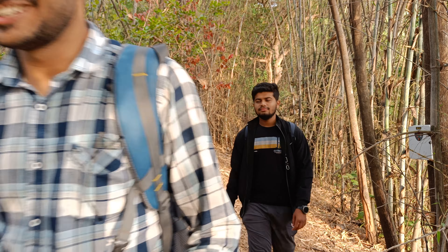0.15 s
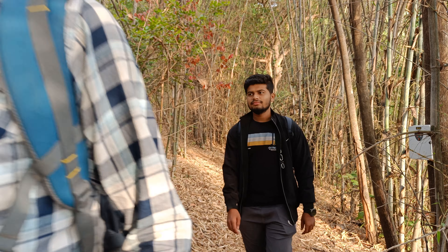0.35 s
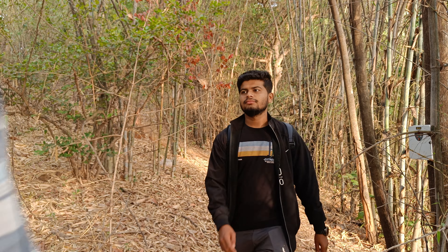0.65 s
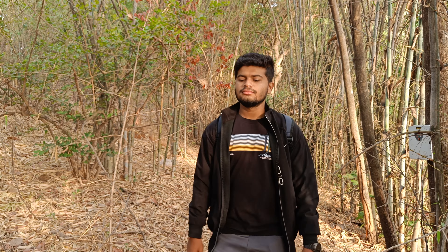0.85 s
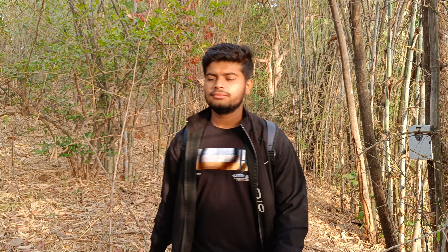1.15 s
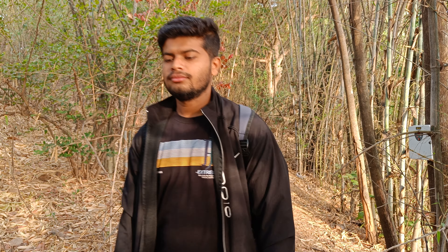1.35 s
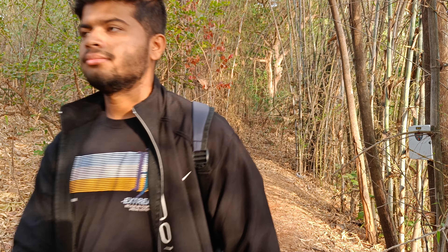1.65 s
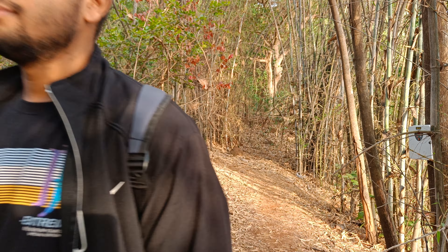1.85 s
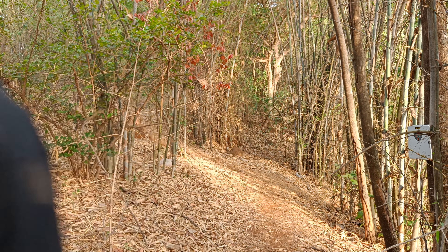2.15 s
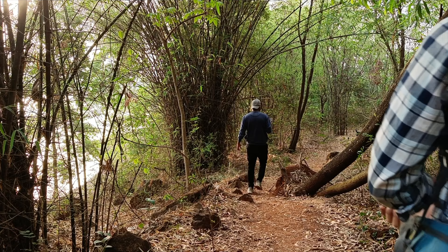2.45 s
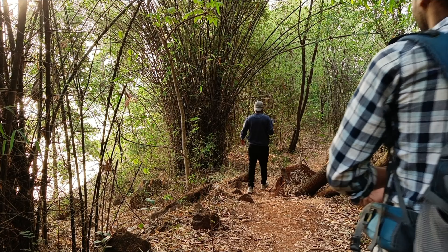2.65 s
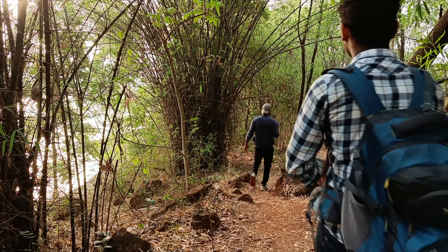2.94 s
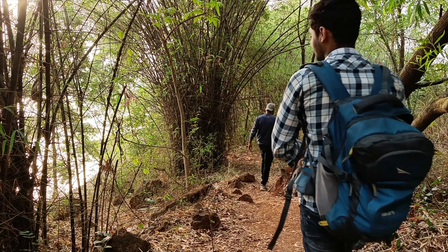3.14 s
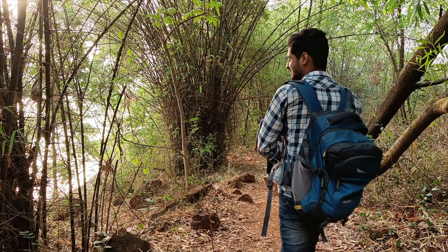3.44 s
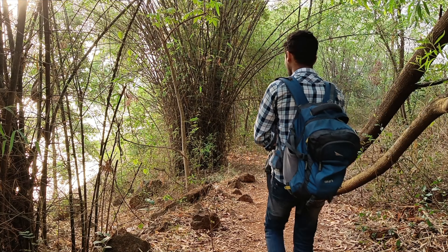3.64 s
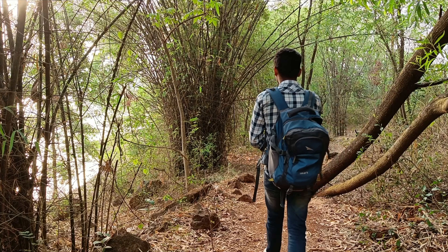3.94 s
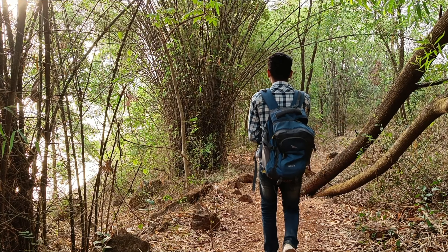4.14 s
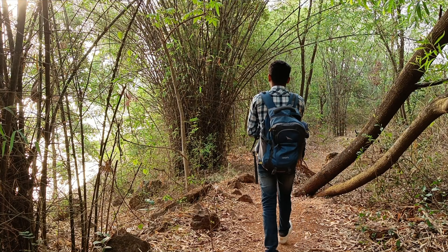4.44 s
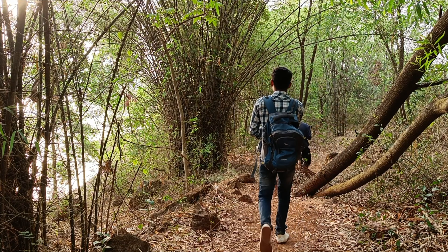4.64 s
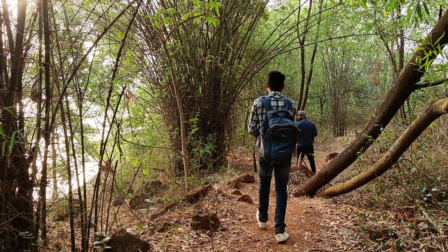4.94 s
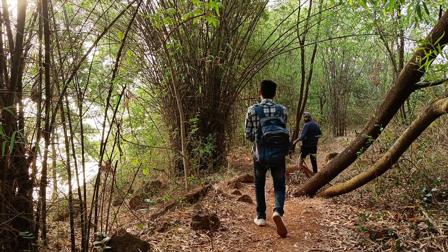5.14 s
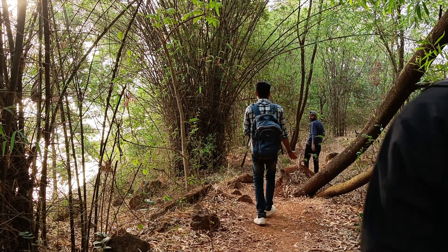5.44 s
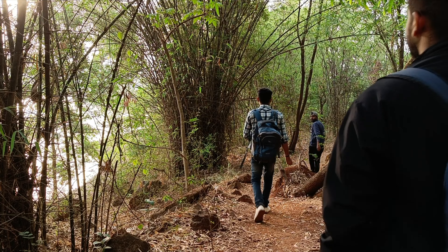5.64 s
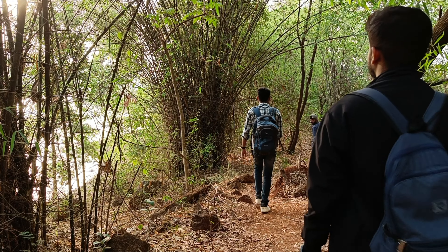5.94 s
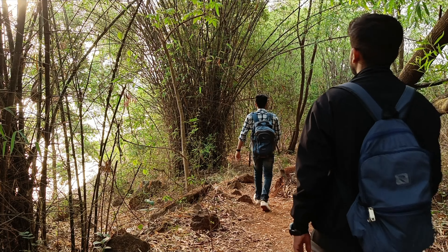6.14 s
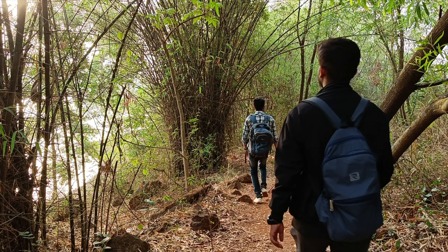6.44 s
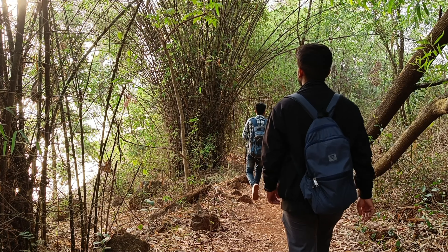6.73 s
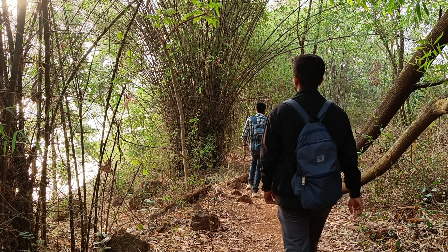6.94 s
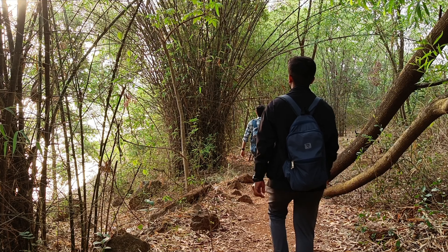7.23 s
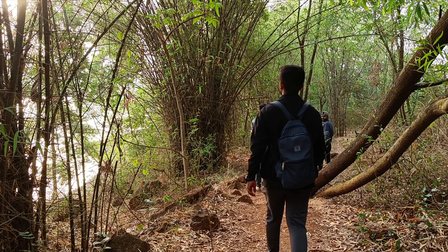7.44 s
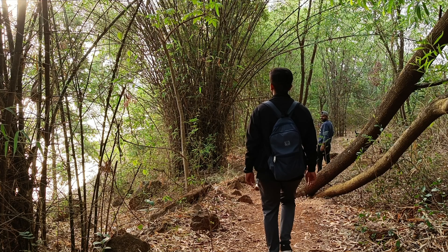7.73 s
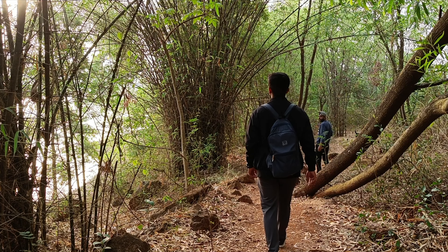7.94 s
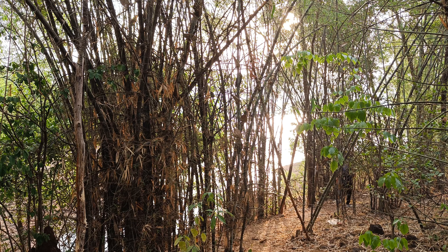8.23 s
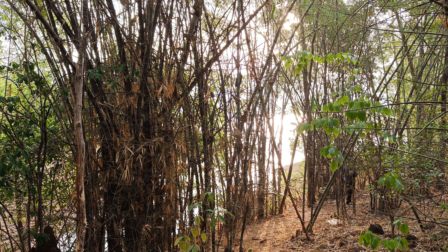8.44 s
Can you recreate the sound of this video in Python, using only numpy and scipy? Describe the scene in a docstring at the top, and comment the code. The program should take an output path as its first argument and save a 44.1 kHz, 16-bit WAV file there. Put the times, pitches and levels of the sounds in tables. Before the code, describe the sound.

Forest birds chirrup, pip, whistle and trill over a soft outdoor hiss, with faint water trickle and walkers' steps rustling past at the start.

```python
"""Birds in a bamboo wood

A chirruping bird on the left, runs of thin high pips, whistles, trills and nasal calls are bent tones.
Trunks and canes scatter the calls as random echoes. Ringing bubbles trickle under a soft noise hiss.
Walkers pass in the first two seconds: noise footfalls, rustling clothes and cracking sticks.
Short noise bursts make dull crunches and ticks of dry litter throughout."""
import sys
import numpy as np
from scipy import signal
from scipy.fft import rfft, irfft
from scipy.io import wavfile
from scipy.ndimage import uniform_filter1d

SR = 44100
rng = np.random.default_rng(int(sys.argv[2]) if len(sys.argv) > 2 else 0)


def dump_mix(stems):
    """Bounce the given channels to the path in sys.argv[1] as a 16-bit WAV at rate SR."""
    frames = np.atleast_2d(stems).T  # one column per channel
    limited = np.clip(frames, -1, 1)  # hard clip at full scale
    pcm = np.round(limited * 32767).astype(np.int16)
    wavfile.write(sys.argv[1], SR, pcm)


N = 378378


def amp(db):
    """Decibels to gain."""
    return 10 ** (np.asarray(db) / 20)


def evened(x):
    """Scales to rms 1."""
    return x / np.sqrt(np.mean(x ** 2) + 1e-20)


def read(points, hz):
    """Reads a table on a log-frequency axis."""
    f, value = np.transpose(points)
    return np.interp(np.log(hz + 1), np.log(f + 1), value)


def follow(points):
    """Reads a table of (time, value) at every sample of the scene."""
    return np.interp(np.arange(N) / SR, *np.transpose(points))


def clock(length):
    """Sample times of a short sound."""
    return np.arange(max(round(length * SR), 8)) / SR


def add(mix, s, sound, pan_db=0, lag_ms=None):
    """Places a sound in stereo, positive to the left; the farther microphone is softer and later."""
    if lag_ms is None:
        lag_ms = .0205 * pan_db
    lag = lag_ms / 1000
    sides = amp([[pan_db / 2], [-pan_db / 2]]) * sound
    for channel, side, later in zip(mix, sides, (max(-lag, 0), max(lag, 0))):
        part = channel[max(round((s + later) * SR), 0):][:len(side)]
        part += side[:len(part)]


def tint(x, colour):
    """Filters by a spectrum, keeping the power of white noise."""
    gain = evened(amp(read(colour, np.fft.rfftfreq(N, 1 / SR))))
    return irfft(rfft(x) * gain, N)


def no_bass(x, lowest_hz):
    """Small sources radiate nothing low: a high-pass filter."""
    return signal.sosfilt(signal.butter(3, lowest_hz, "high", fs=SR, output="sos"), x)


def waver(n, hz):
    """A random drift around zero that takes a new value hz times a second."""
    turns = int(n * hz / SR) + 2
    return np.interp(np.arange(n) * hz / SR, np.arange(turns), rng.standard_normal(turns))


def bend(length, start_hz, middle_hz, end_hz):
    """A smooth pitch path through a start, a middle and an end."""
    u = np.linspace(-1, 1, len(clock(length)))
    slope = (end_hz - start_hz) / 2
    curve = (start_hz + end_hz) / 2 - middle_hz
    return middle_hz + u * slope + u ** 2 * curve


def sing(hz, envelope, jitter=0.005):
    """A syrinx: an almost pure tone with a slight tremor, starting and stopping softly."""
    trembling_hz = hz * (1 + jitter * waver(len(hz), 498))
    tone = np.sin(2 * np.pi * np.cumsum(trembling_hz) / SR)
    return envelope * tone * signal.windows.tukey(len(hz), .1)


def slur(length, start_hz, middle_hz, end_hz, jitter=0.0029):
    """One note that bends through three pitches under a rounded swell."""
    hz = bend(length, start_hz, middle_hz, end_hz)
    swell = np.sqrt(abs(np.sin(np.linspace(0, np.pi, len(hz)))))
    return sing(hz, swell, jitter)


def rasping(hz, rasp):
    """A note whose pitch shakes fast enough to tear it into a band, and whose level sputters."""
    sputter = amp(3.5 * waver(len(hz), 450) - 1)
    return sing(hz * (1 + rasp * waver(len(hz), 1400)), sputter)


def canes(x, scatter_db, decay):
    """Bamboo canes right around a bird smear each note with a dense burst of early echoes."""
    t = clock(.04)
    taps = rng.standard_normal((2, len(t))) * np.exp(-t / decay) * (t > .001)
    taps /= np.linalg.norm(taps, axis=1, keepdims=True)
    return x + amp(scatter_db) * signal.oaconvolve(x, taps, axes=1)[:, :N]


def trees(x, wet_db, delay=0.0089):
    """Adds the sparse echoes of many trunks, each band dying at its own speed."""
    # echo of the trees: (frequency [Hz], time to fall by 60 dB [s])
    wood = [(300, 0.35), (2000, 0.35), (4000, 0.38), (8000, 0.45)]
    late = clock(.5) > delay
    sparse = rng.random((2, len(late))) < 1500 / SR  # 1500 echoes a second on average
    taps = rng.standard_normal((2, len(late))) * sparse * late
    hz, t, z = signal.stft(taps, SR, nperseg=256)
    fade = amp(-60 * t / read(wood, hz)[:, None])
    tail = signal.istft(z * fade, SR, nperseg=256)[1]
    tail /= np.linalg.norm(tail, axis=1, keepdims=True)
    crossed = x + .25 * x[::-1]  # some of each side reaches the other
    return x + amp(wet_db) * signal.oaconvolve(crossed, tail, axes=1)[:, :N]


def ringing_echo(x, ring_hz=4480, ring_db=-1):
    """One narrow band lingers among the canes as a thin held tone."""
    ring = signal.lfilter(*signal.iirpeak(ring_hz, 25, fs=SR), x)
    return amp(ring_db) * (trees(ring, wet_db=3) - ring)  # the echo alone


def chirruper(pan_db=10, lead_rasp=0.071, lead_length=0.037, lead_hz=5580):
    """A raspy call of arched syllables, repeated about once a second and never quite alike."""
    # chirrups: (time [s], level [dB], lead-in level [dB], form [0 arched, 1 flat])
    chirrups = [(0.337, -35, -59, 0), (1.018, -36.5, -49.5, 0), (1.825, -37.5, -56, 1),
                (2.665, -34.5, -48, 0), (3.651, -37, -50.5, 1), (4.387, -35.5, -52.5, 0),
                (5.468, -36.5, -53, 1), (6.253, -35.5, -47, 0), (7.177, -34.5, -47, 0),
                (7.978, -36.5, -53, 1)]
    # arched form: (start from the chirrup's time [s], length [s], nominal start, middle and end
    # pitch [Hz, Hz, Hz], level against the chirrup [dB], rasp [share of the pitch])
    arched = [(-.052, .04, 4050, 4480, 3600, -2, .04), (-.001, .023, 3020, 3400, 3650, 0, .015),
              (.022, .03, 3637, 3146, 2460, -1, .07)]
    # flat form, with a quick flick before the last arch: (the same columns)
    flat = [(-.078, .028, 2860, 3340, 4040, -7.5, 0.02), (-.053, 0.0424, 4028, 4230, 4210, 1, 0.037),
            (-.016, .014, 4704, 4600, 2650, 0.5, 0.103), (-.001, .018, 2850, 3400, 3600, 3, .02),
            (.015, .027, 3640, 3107, 1990, -1.5, 0.074)]
    # the call flares as its pitch sweeps through a peak: (pitch [Hz], gain [dB])
    flare = [(2200, -2), (2750, -4.5), (3020, -7), (3300, 1.5), (3550, -5), (3750, 3.5), (4100, -6.5)]
    # the high buzzy opening note starts ahead of the chirrup's time by: (arched [s], flat [s])
    lead_ahead = (.066, .092)
    out = np.zeros((2, N))
    for s, db, lead_db, form in chirrups:
        is_flat = form > .5
        for after, length, start_hz, middle_hz, end_hz, syllable_db, rasp in (flat if is_flat else arched):
            hz = bend(length, start_hz, middle_hz, end_hz)
            hz = hz * (1 + .012 * rng.standard_normal())
            level = amp(db + syllable_db + read(flare, hz))
            add(out, s + after, level * rasping(hz, rasp), pan_db)
        lead_in = rasping(bend(lead_length, 0.75 * lead_hz, lead_hz, .97 * lead_hz), lead_rasp)
        lead_in = amp(lead_db) * lead_in * signal.windows.tukey(len(lead_in))
        add(out, s - lead_ahead[int(is_flat)], lead_in, pan_db)
    blurred = canes(out, scatter_db=-5.5, decay=.009)
    return trees(blurred, wet_db=-6, delay=.012) + ringing_echo(out)


def pipper(level_db=-48, pan_db=7, length=0.031, gap=.1375):
    """Thin hooked pips bend up, then down, seven a second, close and dry."""
    # runs of pips: (time of the first [s], pips [count])
    pip_runs = [(.035, 1), (.579, 5), (1.678, 4), (2.778, 4), (3.736, 4), (4.842, 5), (5.809, 4),
                (6.769, 4), (7.738, 5)]
    out = np.zeros((2, N))
    for first, count in pip_runs:
        for s in first + gap * np.arange(round(count)):
            add(out, s, amp(level_db) * slur(length, 7470, 7590, 7170, jitter=0.0016), pan_db)
    return trees(out, wet_db=-32)


def whistlers(jitter=0.0077, flutter_db=2):
    """Low mellow whistles swell, waver and fade deeper in the wood, blurred by echo."""
    # whistles: (time [s], length [s], start, middle and end pitch [Hz, Hz, Hz], level [dB],
    # perch [index, rounded])
    whistles = [(0, 0.052, 3550, 3140, 2310, -41, 2), (0.054, .11, 2280, 2760, 2880, -51, 2),
                (.28, 0.1, 2330, 2230, 2425, -50, 2.5), (0.384, 0.09, 2380, 2750, 2870, -47.5, 2.5),
                (.52, 0.25, 1930, 1936, 1820, -43.5, 0.5), (0.849, .15, 2280, 2110, 2070, -41.5, -0.5),
                (1.17, 0.18, 1950, 1950, 2090, -40, 0), (1.182, 0.32, 2110, 2347, 3130, -41, 2),
                (1.949, .12, 2470, 2265, 1720, -41.5, 3), (1.968, 0.063, 2340, 2060, 1780, -43.5, 3),
                (2.691, 0.12, 1950, 1976, 1826, -39, 0), (4.451, .22, 3390, 3430, 3370, -41, 0.5),
                (7.49, 0.185, 2110, 2260, 2240, -48, 2), (7.69, 0.26, 2025, 1943, 1806, -44, 0)]
    # gain as the pitch passes through: (pitch [Hz], gain [dB])
    pitch_gain = [(2200, 0), (2400, 3.5), (2650, 5.5), (2800, -4)]
    # perches, numbered from 0: (left-right [dB], lag of the right microphone [ms])
    perches = [(-.5, 0.18), (11.5, 0.25), (5.5, .073), (-4.5, 0.16)]
    out = np.zeros((2, N))
    for s, length, start_hz, middle_hz, end_hz, db, perch in whistles:
        hz = bend(length, start_hz, middle_hz, end_hz)
        hz = hz * (1 + .008 * waver(len(hz), 90))
        level = amp(db + read(pitch_gain, hz) + flutter_db * waver(len(hz), 69))
        swell = level * np.sin(np.linspace(0, np.pi, len(hz)))
        pan_db, lag_ms = perches[min(round(perch), len(perches) - 1)]
        add(out, s, sing(hz, swell, jitter), pan_db, lag_ms)
    return trees(canes(out, scatter_db=-10, decay=.015), wet_db=-7.5)


def chipper(pan_db=10, length=0.041):
    """A bird on the left gives a loose string of raspy chips that drop fast, then flatten."""
    # falling chips: (time [s], nominal start pitch [Hz], level [dB])
    chips = [(4.034, 4100, -49), (4.268, 3890, -47), (4.595, 3520, -44.5), (4.734, 3570, -40.5),
             (4.882, 3460, -39.5), (5.024, 3300, -42.5), (5.144, 3200, -45.5), (5.338, 3510, -43.5)]
    out = np.zeros((2, N))
    for s, start_hz, db in chips:
        hz = bend(length, start_hz, .8 * start_hz, .674 * start_hz)
        hz = hz * (1 + .025 * rng.standard_normal())
        add(out, s, amp(db) * rasping(hz, .035), pan_db)
    return trees(canes(out, scatter_db=-6, decay=.016), wet_db=-4)


def peakers(pan_db=-1, rasp=0.052, ends=.68):
    """A bird almost straight ahead flicks its raspy pitch up to a point and down again."""
    # pointed chirps: (time [s], length [s], top pitch [Hz], level [dB])
    chirps = [(2.954, 0.058, 4620, -49), (5.279, .055, 4140, -55), (5.667, 0.031, 4930, -44.5),
              (6.984, 0.043, 4990, -42.5)]
    out = np.zeros((2, N))
    for s, length, top_hz, db in chirps:
        point = 1 - abs(np.linspace(-1, 1, len(clock(length))))
        hz = top_hz * (ends + (1 - ends) * point)
        add(out, s, amp(db) * np.sqrt(point) * rasping(hz, rasp), pan_db)
    return trees(out, wet_db=-9)


def cheepers(pan_db=5, ends=0.83):
    """Single soft notes, each one shallow arch of pitch, left of the middle."""
    # cheeps: (time [s], length [s], top pitch [Hz], level [dB])
    cheeps = [(2.867, .026, 3330, -43), (2.893, .022, 3330, -45), (3.923, 0.04, 3850, -51),
              (5.116, 0.023, 2246, -43), (5.374, 0.094, 3050, -46), (6.147, .035, 3350, -43),
              (6.402, 0.08, 5470, -47.5), (6.632, .061, 5450, -46)]
    out = np.zeros((2, N))
    for s, length, hz, db in cheeps:
        add(out, s, amp(db) * slur(length, ends * hz, hz, ends * hz, jitter=0.017), pan_db)
    return trees(out, wet_db=-2.5)


def trillers(pan_db=5):
    """Runs of notes that each sweep down, blurred by the canes; each run slows as it goes."""
    # trills: (time of the first note [s], time of the last [s], notes [count], slowing [0-1],
    # note length [s], top pitch [Hz], bottom pitch [Hz], level [dB])
    trill_runs = [(1.252, 2.045, 16, 0.09, 0.024, 4495, 3520, -42.5),
                  (3.754, 4.215, 5, 0.01, 0.015, 5480, 4640, -40),
                  (8.205, 8.514, 5, 0.13, 0.0278, 4060, 3110, -43.5)]
    out = np.zeros((2, N))
    for first, last, count, slowing, length, top_hz, bottom_hz, db in trill_runs:
        u = np.linspace(0, 1, round(count))
        middle_hz = np.sqrt(top_hz * bottom_hz)
        for s in first + (last - first) * u * (1 - slowing * (1 - u)):
            add(out, s, amp(db) * slur(length, top_hz, middle_hz, bottom_hz, jitter=.008), pan_db)
    return trees(canes(out, scatter_db=-8, decay=.008), wet_db=-8)


def nasal_call(s=4.875, length=0.078, pitch_hz=1240, throat_hz=5100, level_db=-35,
               below_db=60, above_db=19, arch=0.34):
    """One arched stack of harmonics from the right; the throat favours the few near its resonance."""
    out, u = np.zeros((2, N)), np.linspace(-1, 1, len(clock(length)))
    pitch = pitch_hz * (1 - arch * abs(u) ** 3 + 0.0077 * waver(len(u), 580))
    k = np.arange(2, 13)[:, None]  # harmonic numbers
    octaves = np.log2(k * pitch_hz / throat_hz)
    # the resonance falls off in dB per octave on either side, down to a floor
    throat_db = np.maximum(np.minimum(below_db * octaves, -above_db * octaves), -28)
    partials = amp(throat_db) * np.sin(2 * np.pi * k * np.cumsum(pitch) / SR)
    add(out, s, amp(level_db) * partials.sum(0) * signal.windows.tukey(len(u), .4), -7)
    return trees(canes(out, scatter_db=-9, decay=.005), wet_db=-11)


def twitterers(note_s=0.0185, spread=0.041, count=2):
    """Each twitter is a flutter of tiny arched notes, with sidebands from a fast buzz."""
    # twitters: (time [s], pitch the notes scatter around [Hz], level they scatter around [dB])
    twitters = [(5.24, 5370, -48), (5.6, 6280, -45), (6.277, 5900, -40), (6.368, 5700, -48.5),
                (6.68, 6090, -42.5), (6.76, 5770, -49), (7.108, 5900, -39), (7.215, 5810, -44.5),
                (7.59, 6040, -45.5), (7.659, 5860, -46), (8.044, 5720, -44.5), (8.533, 6400, -42)]
    out, t = np.zeros((2, N)), clock(note_s)
    buzz = 1 + .7 * np.sin(2 * np.pi * 850 * t)
    for s, pitch_hz, db in twitters:
        for k, (pitch, size) in enumerate(rng.standard_normal((count, 2))):
            hz = pitch_hz * np.exp(spread * pitch)
            note = slur(note_s, .9 * hz, hz, .94 * hz, jitter=.016) * buzz
            add(out, s + k * 0.018, amp(db + size) * note, 2)
    return trees(out, wet_db=-4.5)


def far_birds(trim_db=-4.0, pitch_hz=3800, spread=.13, note_s=.022, count=700, spread_db=3):
    """Many distant chirps blur into a chorus that is mostly echo."""
    # loudness of the chorus: (time [s], level before the trim [dB])
    chorus = [(0, -42.5), (.7, -46.5), (3.1, -48.5), (4.049, -48), (4.65, -41), (5.35, -46), (6, -50.5),
              (6.45, -43), (6.919, -50.5), (8.05, -42.5), (8.58, -55)]
    out = np.zeros((2, N))
    times, chances = rng.uniform(0, N / SR, count), rng.standard_normal((count, 4))
    for s, (pitch, sweep, size, side) in zip(times, chances):
        hz = pitch_hz * np.exp(spread * pitch)
        chirp = slur(note_s, hz * np.exp(0.1494 * sweep), hz, 0.847 * hz)
        add(out, s, amp(spread_db * min(size, 1)) * chirp, 3 + 3 * side)
    return amp(trim_db + follow(chorus)) * evened(trees(out, wet_db=5))


def bubble(hz, cycles=6, rise=3.05):
    """A pocket of air rings and rises in pitch as it nears the surface."""
    t = clock(0.033)
    ring = np.sin(2 * np.pi * hz * t * (1 + rise * t / 2))
    return ring * np.exp(-t * hz / cycles) * (1 - np.exp(-t / 0.00034))


def trickle(level_db=-57, lowest_hz=240, count=420, spread_db=4.5):
    """Water rings as small bubbles at random and a few larger drops."""
    # water drops: (time [s], bubble pitch at the start [Hz], level [dB])
    drops = [(1.344, 384, -45), (1.553, 350, -42.5), (2.215, 584, -35), (2.358, 883, -40),
             (3.225, 400, -48), (3.6, 440, -44.5), (4.535, 780, -38.5), (4.564, 530, -41.5),
             (5.052, 342, -36.5), (5.232, 472, -41.5), (6.025, 618, -42.5), (7.843, 385, -45.5)]
    out = np.zeros((2, N))
    for (when, pitch), (size, side) in zip(rng.random((count, 2)), rng.standard_normal((count, 2))):
        level = amp(level_db + spread_db * min(size, 2))
        add(out, when * N / SR, level * bubble(430 * 5 ** pitch), 4 * side)
    for s, hz, db in drops:
        add(out, s, amp(db) * bubble(hz))
    return trees(no_bass(out, lowest_hz), wet_db=-11)


def footfalls():
    """Soles press the dirt with a dull puff of noise, partly shared by both sides."""
    # footfalls: (time [s], length [s], level before the colour [dB])
    steps = [(0.089, 0.045, -40.5), (0.233, 0.06, -46), (0.632, 0.045, -40.5), (1.766, 0.015, -38)]
    # colour of a sole on dirt: (frequency [Hz], relative level [dB])
    step_colour = [(40, -31), (150, -4.5), (350, 4.5), (1200, 3.5), (2500, -25), (16000, -44)]
    soles = np.zeros((2, N))
    for s, length, db in steps:
        t = clock(3 * length)
        puff = rng.standard_normal(len(t)) + .5 * rng.standard_normal((2, len(t)))
        add(soles, s, amp(db) * puff * np.exp(-2 * t / length) * (1 - np.exp(-t / 0.0003)))
    return tint(soles, step_colour)


def rustling(crunch_db=2.5, grain_db=4):
    """Cloth and dry leaves rub in crackly bursts of grainy noise that trail off."""
    # rustles: (time [s], rise [s], hold [s], time to fall by 1/e [s], level before the colour [dB])
    rustles = [(0.086, .005, 0.028, 0.024, -47.5), (0.141, 0.062, 0.077, 0.049, -44.5),
               (.615, 0.019, 0.012, 0.017, -49.5), (0.833, 0.057, 0.054, .1, -53),
               (1.66, 0.039, .05, 0.13, -54), (1.862, 0.024, 0.091, .024, -46),
               (2.201, 0.0076, 0.019, 0.0059, -36.5), (2.225, 0.0074, 0.037, 0.0039, -40)]
    # colour of cloth and leaves: (frequency [Hz], relative level [dB])
    rustle_colour = [(100, -15.5), (700, 13.5), (2000, 4.5), (5000, 1), (7200, 5.5), (9500, -0.5),
                     (13000, 5), (16000, -3.5)]
    cloth = np.zeros((2, N))
    for s, rise, hold, fall, db in rustles:
        t = clock(rise + hold + 4 * fall)
        envelope = np.minimum(t / rise, 1) * np.exp(-np.maximum(t - rise - hold, 0) / fall)
        grains = amp(crunch_db * waver(len(t), 400) + grain_db * waver(len(t), 5000))
        rub = evened(grains * rng.standard_normal((2, len(t))))
        add(cloth, s, amp(db) * envelope * rub, 4)
    return tint(cloth, rustle_colour)


def crunches(level_db=-39, count=50):
    """Feet farther down the path crush twigs and leaves in short dull crunches of uneven length."""
    out, t = np.zeros((2, N)), clock(.06)
    times, chances = rng.uniform(0, N / SR, count), rng.standard_normal((count, 3))
    for s, (size, side, slow) in zip(times, chances):
        grit = rng.standard_normal(len(t)) * amp(3 * waver(len(t), 500))
        fade = np.exp(-t / (.008 * np.exp(.4 * slow)))
        add(out, s, amp(level_db + 2.5 * min(size, 1.5)) * grit * fade, 2 * side)
    return signal.sosfilt(signal.butter(3, (480, 1900), "band", fs=SR, output="sos"), out)


def sticks(decay=0.00039):
    """Dry sticks crack underfoot with a short woody knock, a ring that dies almost at once."""
    # cracks: (time [s], level before fade and filter [dB], ring [Hz])
    cracks = [(.906, -22.5, 1720), (1.309, -24.5, 1250)]
    out, t = np.zeros((2, N)), clock(.004)
    for s, db, ring_hz in cracks:
        add(out, s, amp(db) * np.sin(2 * np.pi * ring_hz * t) * np.exp(-t / decay), 2)
    return no_bass(out, lowest_hz=400)


def litter(faint_db=-50, spread_db=4, count=260):
    """Dry leaves and twigs snap in tiny ticks of noise, a few placed and many at random."""
    # placed ticks: (time [s], level before the colour [dB], left-right [dB])
    placed = [(.2843, -38.5, 15), (1.246, -36, 0.5), (5.028, -41, -8), (6.574, -41, 3)]
    # colour of a tick: (frequency [Hz], relative level [dB])
    tick_colour = [(100, -60), (3000, -31), (6500, 8), (12000, -3), (16000, -30)]
    out, t = np.zeros((2, N)), clock(0.008)
    times = rng.uniform(0, N / SR, count)
    faint = np.c_[times, rng.normal(faint_db, spread_db, count), rng.normal(3, 6, count)]
    for s, db, pan_db in np.vstack([placed, faint]):
        add(out, s, amp(db) * rng.standard_normal((2, len(t))) * np.exp(-t / 0.0013), pan_db)
    return tint(out, tick_colour)


def hiss(level_db=-49.5, patchy_db=2.4):
    """Leaves and water make a soft wash of noise with fine quick patches of louder and softer."""
    # colour of the wash: (frequency [Hz], relative level [dB per Hz])
    wash_colour = [(30, -52), (80, -37), (150, -18.5), (280, -8.5), (450, 3), (900, 4.5), (1600, -2),
                   (2400, 2.5), (3400, 0), (4500, -2), (5600, -5.5), (8000, -11), (11000, -15),
                   (16000, -13.5)]
    # likeness of the two sides: (frequency [Hz], correlation [-1 to 1])
    likeness = [(60, 0.5), (1400, 0.47), (2000, 0.15), (16000, 0.01)]
    # balance of the two sides: (frequency [Hz], left-right [dB])
    balance = [(1000, 0), (3500, 3.5), (16000, 1)]
    frames, hz = N // 512 + 5, np.fft.rfftfreq(2048, 1 / SR)
    a, b, c, d, patches = rng.standard_normal((frames, 1025, 5)).T
    patches = uniform_filter1d(patches, size=4, axis=0)  # smooth over frequency, then time
    patches = evened(uniform_filter1d(patches, size=9, axis=1))
    same = np.clip(read(likeness, hz), -1, 1)[:, None]
    lean = amp(read(balance, hz) / 2)[:, None]
    left = a + 1j * b
    right = same * left + np.sqrt(1 - same ** 2) * (c + 1j * d)
    z = np.array([left * lean, right / lean])
    # the patches even out toward the treble
    z *= amp(read(wash_colour, hz)[:, None] + patchy_db * patches / (1 + hz[:, None] / 8000))
    wash = signal.istft(z, nperseg=2048, noverlap=1536)[1][:, :N]
    return amp(level_db) * evened(wash)


def air_rush():
    """A low rush of air, noise partly shared by both sides, comes and goes."""
    # colour of the rush: (frequency [Hz], relative level [dB])
    air_colour = [(20, -24), (45, -6.5), (140, -5.5), (800, -3.5), (2000, -5.5), (16000, -22.5)]
    # loudness of the rush: (time [s], level [dB])
    air_level = [(0, -57), (2.25, -57), (2.3, -100), (8.08, -100), (8.16, -63.5), (8.58, -55)]
    noise = rng.standard_normal(N) + 0.62 * rng.standard_normal((2, N))
    return evened(tint(noise, air_colour)) * amp(follow(air_level))


def scene():
    """Birds, water, walkers and the wood around them."""
    birds = chirruper() + pipper() + whistlers() + chipper() + peakers() + cheepers()
    birds += trillers() + nasal_call() + twitterers() + far_birds()
    walkers = footfalls() + rustling() + crunches() + sticks()
    return birds + trickle() + walkers + litter() + hiss() + air_rush()


def record(dry):
    """A steep low-pass filter: nothing sounds above about 16 kHz."""
    low_pass = signal.firwin(1023, 15900, window=("kaiser", 9), fs=SR)
    return signal.oaconvolve(dry, low_pass[None], "same")


dry = scene()
out = record(dry)
dump_mix(out)
```